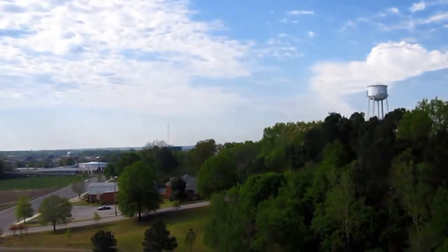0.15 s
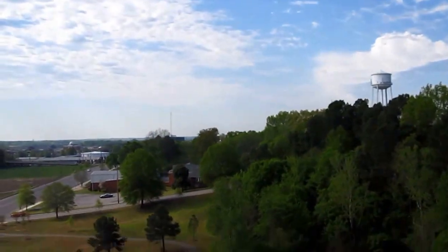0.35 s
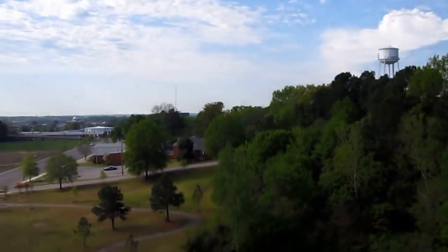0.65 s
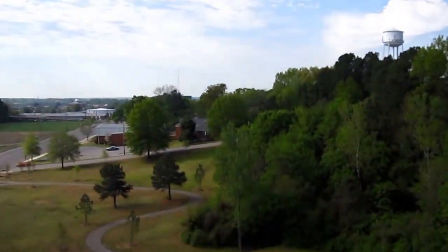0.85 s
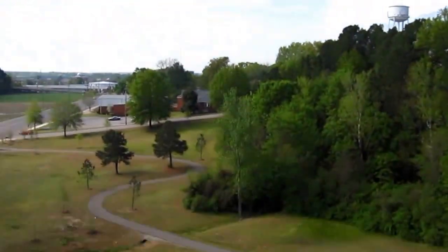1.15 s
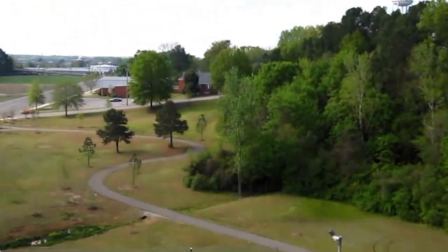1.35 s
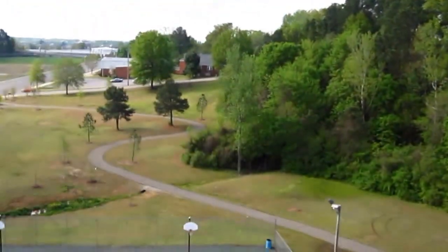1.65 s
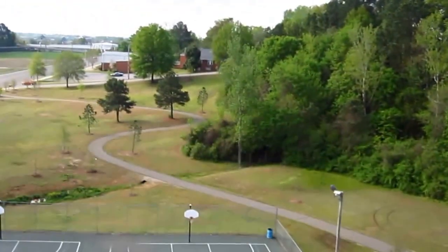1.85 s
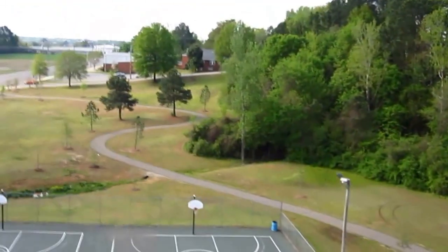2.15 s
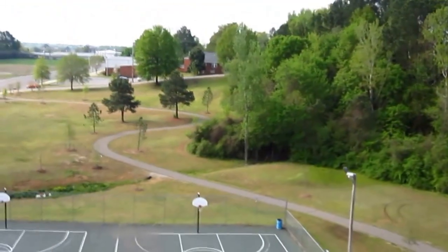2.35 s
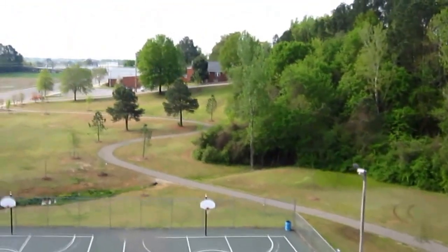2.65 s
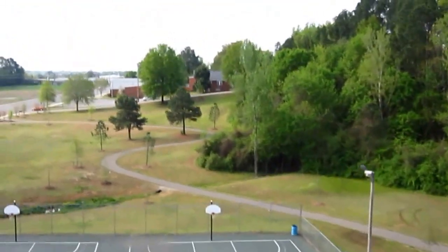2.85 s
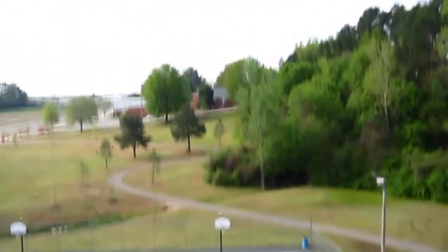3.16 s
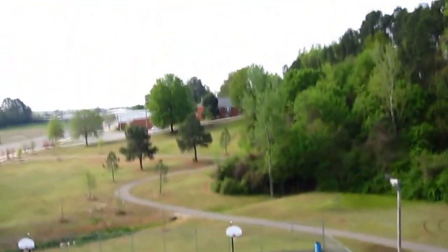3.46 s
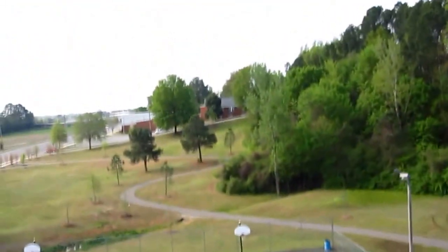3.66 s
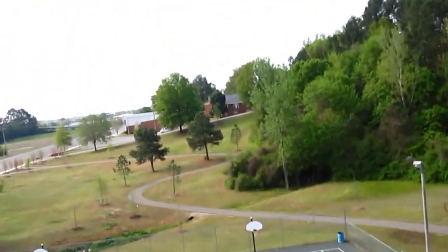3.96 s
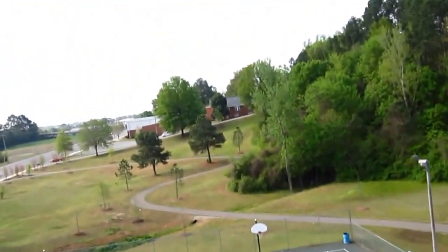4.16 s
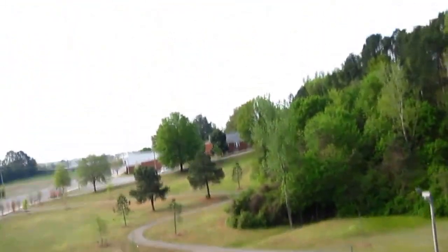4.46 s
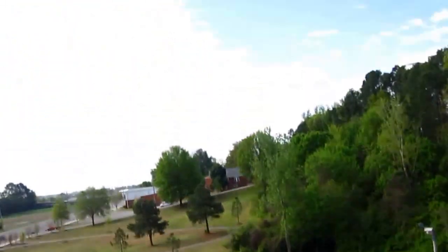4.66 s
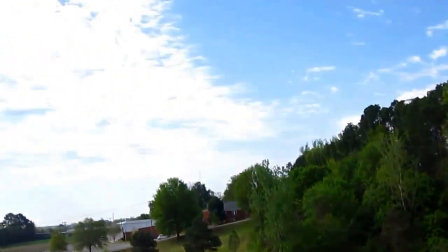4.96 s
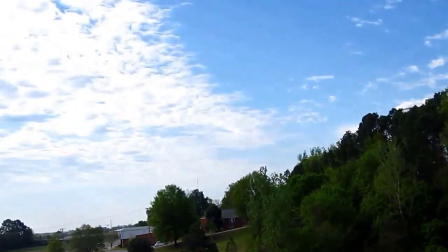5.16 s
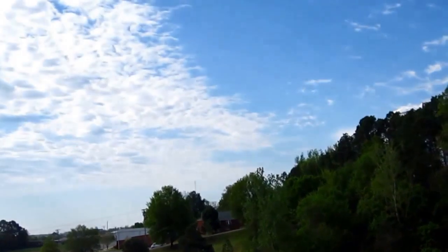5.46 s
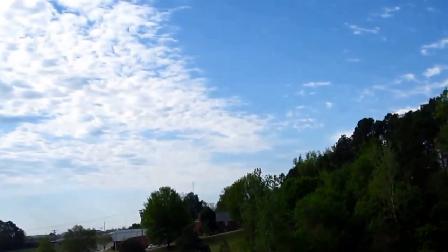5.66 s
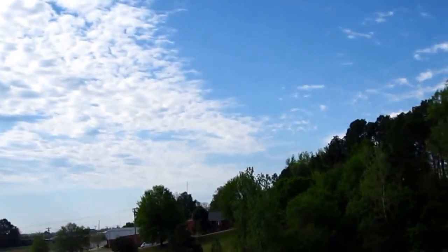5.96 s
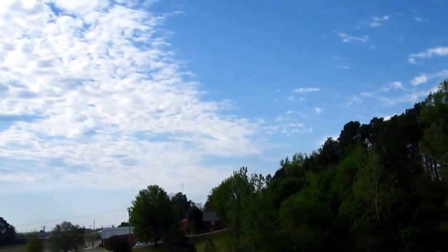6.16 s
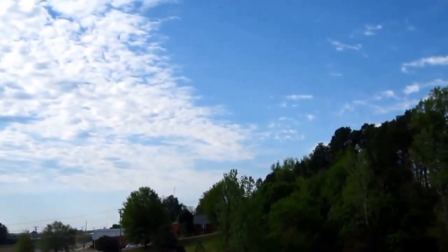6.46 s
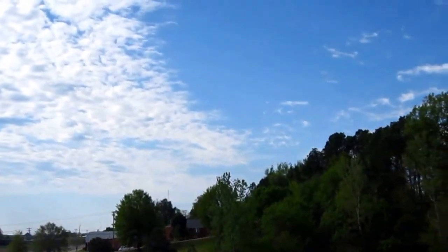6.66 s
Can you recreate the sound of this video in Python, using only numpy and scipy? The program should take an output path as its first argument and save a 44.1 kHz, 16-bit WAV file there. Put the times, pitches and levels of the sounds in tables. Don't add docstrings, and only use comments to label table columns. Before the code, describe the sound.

Heard from a microphone on the frame of a small electric model helicopter outdoors: a piercing, many-toned gear whine over rushing, fluttering rotor air. It holds steady, rises smoothly from about one and a half seconds, peaks past three, then sinks slightly. Short wind buffets hit mid-flight, and the later part grows rougher with faint blade slaps.

```python
import sys
import numpy as np
from scipy import signal
from scipy.fft import rfft, irfft
from scipy.io import wavfile
from scipy.ndimage import uniform_filter1d

SR = 44100
rng = np.random.default_rng(int(sys.argv[2]) if len(sys.argv) > 2 else 0)


def amplitude_ratio(level_db):
    exponent = np.asarray(level_db, float) / 20
    return 10 ** exponent


def digitize_waveform(pressure):
    field = np.atleast_2d(pressure).T
    bounded = np.clip(field, -1, 1)
    quanta = np.round(bounded * 32767).astype(np.int16)
    wavfile.write(sys.argv[1], SR, quanta)


N = 300321
T = np.arange(N) / SR
PINION, GEAR, TAIL = 13, 150, .06


def evened(x):
    return x / np.sqrt(np.mean(abs(x) ** 2) + 1e-20)


def columns(rows):
    s, *values = np.transpose(rows)
    return [np.interp(T, s, v) for v in values]


def bumps(x, rows):
    return sum(height * np.exp(-((x - centre) / width) ** 2) for centre, width, height in rows)


def swells(rows):
    return bumps(T, [(s, half, amplitude_ratio(db)) for s, half, db in rows])


def coloured(x, points):
    f, level_db = np.transpose(points)
    hz = np.fft.rfftfreq(N, 1 / SR)
    curve_db = np.interp(np.log(hz + 1), np.log(f + 1), level_db, -90, -90)
    return irfft(rfft(x) * amplitude_ratio(curve_db), N)


def drift(width_hz):
    r = np.exp(-np.pi * width_hz / SR)
    noise = rng.standard_normal(N) + 1j * rng.standard_normal(N)
    return evened(signal.lfilter([1], [1, -2 * r, r * r], noise))


# (t/s, tooth rate f/Hz)
SPEED = [(0.0, 4781.9), (0.6, 4785.3), (1.17, 4760.0), (1.44, 4767.7), (1.71, 4984.9), (2.49, 5427.9),
         (2.88, 5574.3), (3.3, 5780.2), (3.51, 5743.3), (3.81, 5752.6), (4.14, 5633.1), (4.32, 5613.5),
         (4.83, 5663.7), (5.19, 5629.8), (5.52, 5554.9), (6.06, 5483.0), (6.54, 5452.3), (6.81, 5408.0)]


def tooth_phase():
    rate_hz = columns(SPEED)[0] + 2 * drift(width_hz=3).real
    return 2 * np.pi * np.cumsum(rate_hz) / SR


TEETH = tooth_phase()
TURN = TEETH / GEAR

# (t/s, half length/s, swing/rad at the tooth rate)
JUDDER = [
    (1.8, .17, .3),
    (2.95, .25, .2),
    (4.4, .13, .8),
    (4.6, .55, .4),
    (5.3, .12, .7),
    (5.65, .3, .15),
]


def twist():
    return 0.1 + bumps(T, JUDDER)


# (t/s, half length/s, level/dB)
GUSTS = [
    (2.55, .15, -55),
    (2.922, .02, -40),
    (3.09, .03, -45),
    (3.05, .25, -49),
    (3.327, .02, -38),
    (4.853, 0.028, -44),
    (5.148, 0.25, -50),
    (5.65, .15, -53),
]


def gusts():
    puff = coloured(rng.standard_normal(N), [(20, -20), (90, -2.0), (400, -3), (1000, 1), (2500, -22)])
    return swells(GUSTS) * evened(puff)


# (t/s, rush level/dB)
AIR = [(0, -36), (1.58, -37), (1.76, -31), (2.24, -35.5), (2.5, -35.5), (2.88, -29.5), (3.1, -28.5),
       (3.5, -30), (3.68, -30), (3.84, -30.7), (4.48, -28.5), (4.64, -30), (4.96, -28.5), (5.12, -28),
       (5.4, -29), (5.6, -27.7), (6.08, -31), (6.81, -34)]
USUAL_AIR_DB = -32


def follows_air(level_db, share):
    return level_db + share * (columns(AIR)[0] - USUAL_AIR_DB)


# (f/Hz, level/dB per Hz)
RUSH = [(530, -55), (900, -14.5), (1500, -12.5), (1810, -6.5), (2570, -5), (2770, -4), (3960, -3),
        (4760, -15), (4940, -12), (5050, -15), (5200, -9), (6760, -52), (11400, -120)]
# (f/Hz, level/dB per Hz)
LOW = [(15, -52), (25, -19), (65, -19), (256, -13), (306, -9), (583, -7.5), (673, -7), (1590, -7),
       (1800, -14.5), (2340, 0), (3960, -120)]
# (f/Hz, level/dB per Hz)
HISS = [(4000, -8), (4400, -7.5), (4800, -9.5), (5700, -3.5), (7000, -1), (8000, 1.5), (8400, -5),
        (9300, 1), (10400, -4.5), (11900, 0), (12600, -24), (13600, -15.5), (14500, -26.5), (15800, -26)]
# (f/Hz, level/dB per Hz)
FIZZ = [(11500, -20), (12300, -5), (13200, 0), (15800, -5)]


def air():
    chop = np.exp(.8 * np.cos(2 * TURN - .4)) / 1.17
    gust = drift(width_hz=11.0).real + 0.5 * drift(width_hz=190).real
    layers = [  # spectrum, level/dB, chop depth, gust/dB
        (RUSH, columns(AIR)[0] - .6, .2, .9),
        (LOW, follows_air(-45.6, 1.3), .6, 2.2),
        (HISS, follows_air(-32, 0.86), .12, 1.1),
        (FIZZ, -49.5, .1, .5)]
    out = np.zeros(N)
    for shape, level_db, depth, gust_db in layers:
        noise = evened(coloured(rng.standard_normal(N), shape))
        out += amplitude_ratio(level_db + gust_db * gust) * (1 + depth * (chop - 1)) * noise
    return out


# (start t/s, blade hum level/dB, its octave level/dB)
LEGS = [(0, -66, -65), (.58, -66, -78), (1.2, -64, -76), (1.98, -69, -73), (3.36, -60, -59),
        (4.8, -72, -74), (4.92, -62, -76), (5.36, -59, -57), (5.75, -63, -66), (6.1, -60, -60)]


def blade_hum():
    starts, *levels_db = np.transpose(LEGS)
    leg = np.searchsorted(starts, T, "right") - 1
    blend = int(0.12 * SR)
    hum_db, octave_db = (uniform_filter1d(v[leg], size=blend) for v in levels_db)
    hum = amplitude_ratio(hum_db + 3.5 * twist()) * np.sin(2 * TURN)
    hum += amplitude_ratio(octave_db) * np.sin(4 * TURN + 1)
    hum += amplitude_ratio(-69) * np.sin(6 * TURN)
    return np.sqrt(2) * hum * (1 + 0.11 * drift(width_hz=20).real)


# (t/s, half length/s, slap level/dB)
WAKE = [
    (2.85, .3, -64),
    (5.12, .1, -58),
    (5.4, .08, -56),
    (5.62, .17, -53),
    (6.05, .2, -55),
    (6.5, .3, -56.5),
]
# (f/Hz, level/dB)
SLAP = [(40, -40), (150, -16), (220, 1.5), (450, -3.5), (900, -15), (1600, -41), (3500, -42)]


def blade_slaps():
    passes = np.flatnonzero(np.diff(np.floor(TURN / np.pi - .06)) > 0)
    size, late = rng.standard_normal((len(passes), 2)).T
    group_db = 2.5 * np.sin(2 * np.pi * 14 * T[passes])
    clicks = np.zeros(N)
    clicks[np.clip(passes + (20 * late).astype(int), 0, N - 2)] = amplitude_ratio(2.5 * size + group_db)
    pulses = np.gradient(uniform_filter1d(clicks, size=22)) + 0.029 * clicks
    wake = amplitude_ratio(-69) + swells(WAKE)
    return amplitude_ratio(8.0) * wake * evened(coloured(pulses, SLAP))


# (f/Hz, half
# width/Hz, level/dB)
FRAME = [(4442, 165, -15.4), (4816, 32, 2.6), (5183, 49, 1), (5450, 70, 3), (6470, 311, 17.1),
         (9049, 224, 10), (9625, 500, 7.5), (9670, 60, 3.5), (10510, 410, 8.2), (11247, 99, -4.7),
         (11647, 375, 6.3), (11978, 52, -4.4), (12487, 95, 2.3), (13287, 582, -20),
         (317, 9, 15), (346, 5, 13), (367, 9, 13), (765, 20, 7), (1822, 20, 14)]
CRUISE_HZ, SHAKE_HZ, SHAKE_WIDTH_HZ = 5300, 5570, 24


def heard(orders, rows, offset_hz=0):
    t = T[::256]
    rate = np.interp(t, *np.transpose(SPEED))
    shake = 1 / (1 + np.exp((SHAKE_HZ - rate) / SHAKE_WIDTH_HZ))
    percent = 100 * (rate / CRUISE_HZ - 1)
    levels_db = []
    for k, (db, slope, shake_db) in zip(orders, rows):
        ring_db = bumps(k * rate + offset_hz, FRAME)
        levels_db.append(np.interp(T, t, db + slope * percent + shake_db * shake + ring_db))
    return levels_db


LOWER_SIDES = [1 - TAIL, 2 - TAIL, 12 / PINION, 25 / PINION]


def whine(orders, levels_db, teeth, offset_hz=0, runout=.06, flutter=.08):
    shared, out = drift(width_hz=15.6), np.zeros(N)
    turns = np.exp(1j * np.outer([-3, -2, -1, 1, 2, 3], TURN))
    for k, level_db in zip(orders, levels_db):
        *sides, lag = rng.standard_normal(13)
        wobble = (np.array(sides[:6]) + 1j * np.array(sides[6:])) @ turns
        shake = 1 + runout * wobble + flutter * np.roll(shared, int(lag * N))
        phase = k * teeth + 2 * np.pi * offset_hz * T
        if k in LOWER_SIDES:
            phase = phase - 2.2
        out += amplitude_ratio(level_db) * (shake * np.exp(1j * phase)).real
    return np.sqrt(2) * out


MESH_ORDERS = [1, 2, 24 / PINION, 25 / PINION, 12 / PINION, 14 / PINION]
# (level/dB, slope/dB per %, shake/dB)
MESH = [
    (-33.1, -0.28, 4.7),
    (-28.6, 0.24, -5.0),
    (-53.0, -0.81, 21.4),
    (-47.6, -0.64, 11.5),
    (-53.4, -1.08, 20.6),
    (-48.7, 0.16, 3.0),
]
TAIL_ORDERS = [1 - TAIL, 1 + TAIL, 2 - TAIL, 2 + TAIL, 2 - 2 * TAIL, 2 + 2 * TAIL]
# (level/dB, slope/dB per %, shake/dB)
TAIL_SIDE = [(-42.8, 0.11, 3.7), (-51.6, 0.81, 6.0), (-33.1, 0.5, -3.4), (-33.4, 0.49, -4.6),
             (-48.9, 1.3, -15.4), (-46.9, 1.17, -14.4)]
FAINT_ORDERS = [1.0285, 1 + 2 * TAIL, 1 + 3 * TAIL, 2 - 4 * TAIL, 23 / PINION, 1.863, 27 / PINION, 2.137, 28
                / PINION, 2 + 3 * TAIL, 2 + 4 * TAIL, 30 / PINION]
# (level/dB, slope/dB per %, shake/dB)
FAINT_DB = [(-50.9, 0.43, -0.9), (-58.7, -0.11, -6.1), (-62.0, 0.15, 0.6), (-54.0, 0.07, 4.6),
            (-49.9, -0.02, 2.9), (-51.3, 0.62, 0.7), (-50.1, -0.66, 12.7), (-52.5, 0.38, -0.6),
            (-55.4, 0.7, 3.7), (-49.6, 0.27, -5.4), (-51.2, -0.1, 1.8), (-43.6, 1.59, 0.8)]
EXTRA_ORDERS = [2 - 3 / GEAR, 2 + 3 / GEAR, 6 / PINION, .889, .424, .557, 3 + 3 / GEAR]
# (level/dB, slope/dB per %, shake/dB)
EXTRA_DB = [(-52, -1, 4), (-60, -.8, 6), (-55, 0, 0), (-58, 0, 0), (-53, 1, -5), (-57, 0, 0), (-62, 0, 0)]
# (order, level/dB)
STEADY = [(.622, -48), (.65, -48), (.7065, -51), (.735, -47), (.763, -54), (3 - TAIL, -60), (3, -55),
          (3 + TAIL, -62)]


def gear_tones(teeth):
    main, main_db = MESH_ORDERS + TAIL_ORDERS, MESH + TAIL_SIDE
    faint, faint_db = FAINT_ORDERS + EXTRA_ORDERS, FAINT_DB + EXTRA_DB
    tones = whine(main, heard(main, main_db), teeth, flutter=0.089)
    tones += whine(*np.transpose(STEADY), teeth, runout=.1, flutter=.2)
    return tones + whine(faint, heard(faint, faint_db), teeth, flutter=0.26)


POLE_ORDERS = [12 / PINION, 6 / PINION, 8 / PINION, 9 / PINION, 10 / PINION]
# (level/dB, slope/dB per %, shake/dB)
POLE_DB = [(-34.5, -0.59, 6.6), (-46.7, -0.36, 10.2), (-49.3, 0.48, 8.3), (-44.6, -0.22, 6.6),
           (-52.6, -0.45, 7.6)]
# (order, level/dB)
HIGH_POLES = [(1, -60), (14 / PINION, -64)]
CHOPPER_HZ = 7813.5


def chopper_tones(teeth):
    levels_db = [follows_air(-39, 0.91)] + heard(POLE_ORDERS, POLE_DB, offset_hz=CHOPPER_HZ)
    tones = whine(*np.transpose(HIGH_POLES), teeth, offset_hz=CHOPPER_HZ)
    return tones + whine([0] + POLE_ORDERS, levels_db, teeth, offset_hz=CHOPPER_HZ, runout=.035)


SHAFT_ORDERS = [1 / PINION, TAIL, 2 / PINION, 2 * TAIL, 3 * TAIL, .334]
# (level/dB, slope/dB per %, shake/dB)
SHAFTS = [
    (-64, 0.37, 0.5),
    (-65, 0.5, -6.5),
    (-63, 0.04, -4),
    (-59, 0.38, -0.5),
    (-60.5, 1.11, -4),
    (-63, 1.5, 4),
]


def shaft_tones(teeth):
    return whine(SHAFT_ORDERS, heard(SHAFT_ORDERS, SHAFTS), teeth, flutter=0.18)


def grinding(slow):
    octave = drift(width_hz=1500) * np.exp(1.97j * TEETH)
    tooth = amplitude_ratio(-5.0) * drift(width_hz=700) * np.exp(1j * TEETH)
    return amplitude_ratio(-26 - 1.1 / slow) * (octave + tooth).real


def drivetrain():
    slow = twist()
    swing = 2 * np.pi * 26 * T + 1.1 * drift(width_hz=7).real
    teeth = TEETH + slow * np.sin(swing) + 0.067 * np.sin(2 * TURN)
    tones = gear_tones(teeth) + chopper_tones(teeth) + shaft_tones(teeth)
    load = 1 + .12 * slow * np.cos(swing)
    load += .08 * np.cos(2 * TURN) + .07 * np.cos(3 * TURN)
    load += .06 * drift(width_hz=60).real
    return load * (tones + grinding(slow))


def scene():
    mono = gusts() + air() + blade_hum() + blade_slaps() + drivetrain()
    return np.array([mono, mono])


def roll_off(x):
    return signal.sosfilt(signal.butter(12, 15690, fs=SR, output="sos"), x)


def record(dry):
    mix = 0.73 * np.tanh(dry / 0.73)
    return roll_off(mix)


dry = scene()
out = record(dry)
digitize_waveform(out)
```